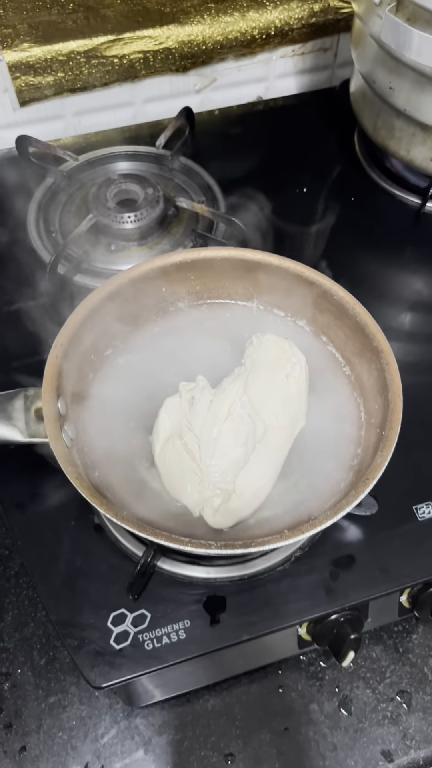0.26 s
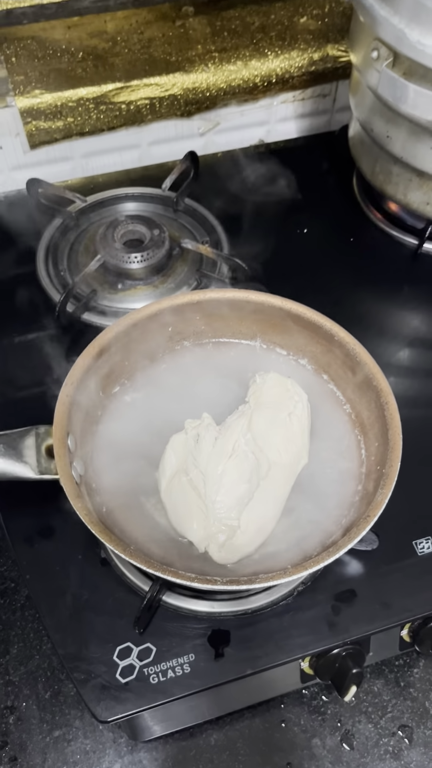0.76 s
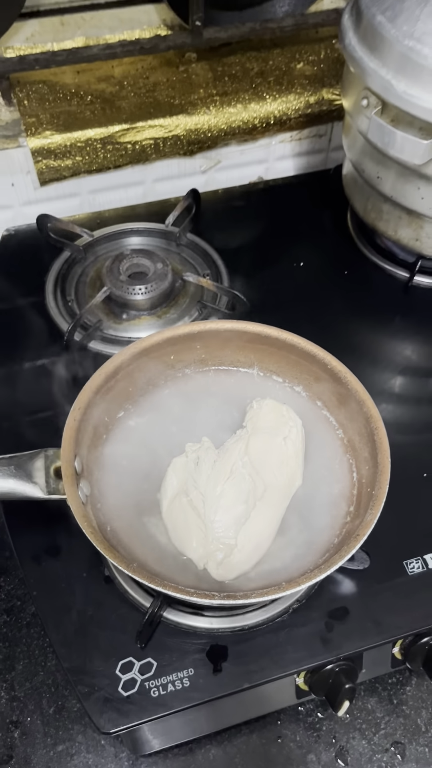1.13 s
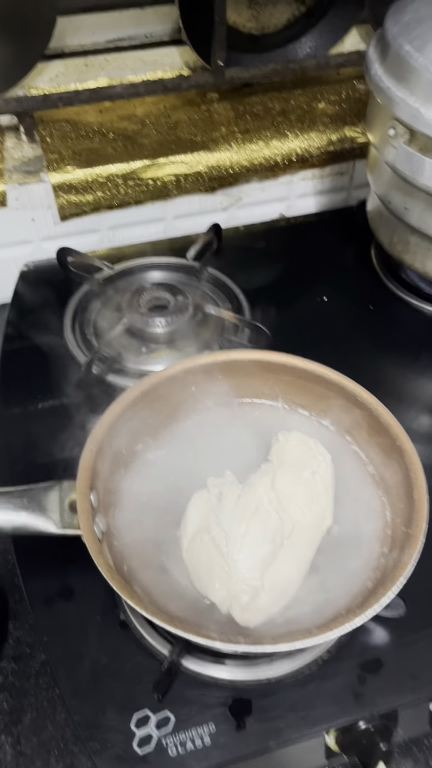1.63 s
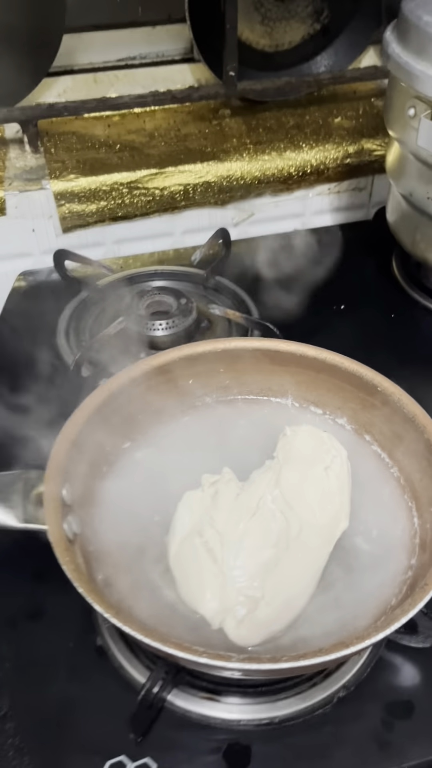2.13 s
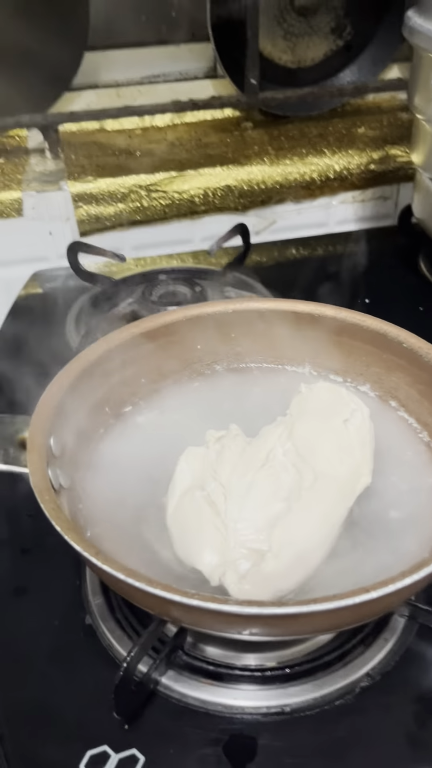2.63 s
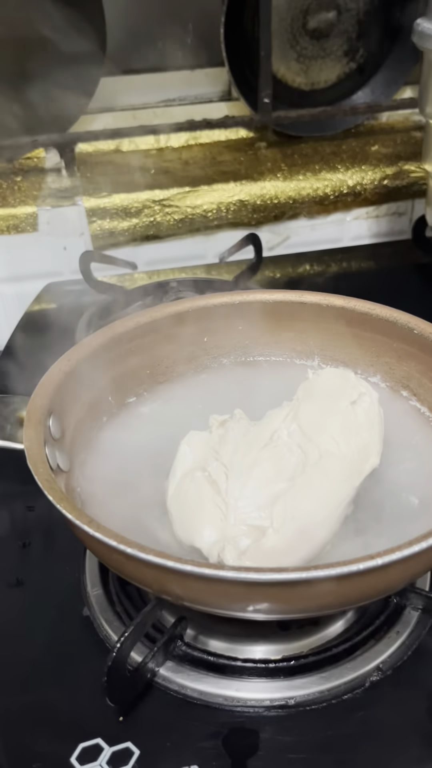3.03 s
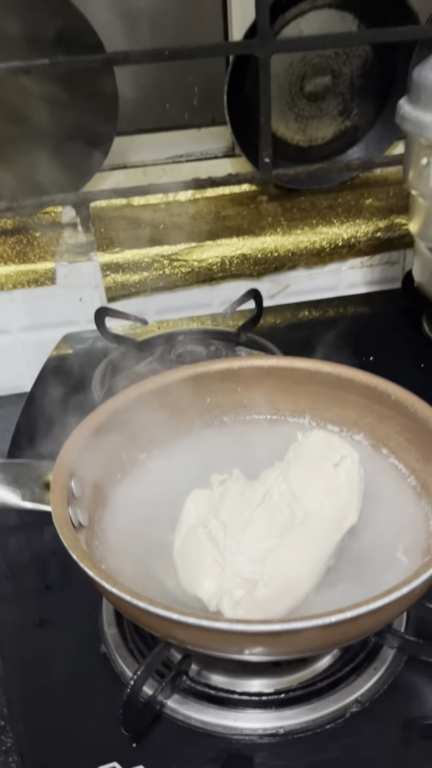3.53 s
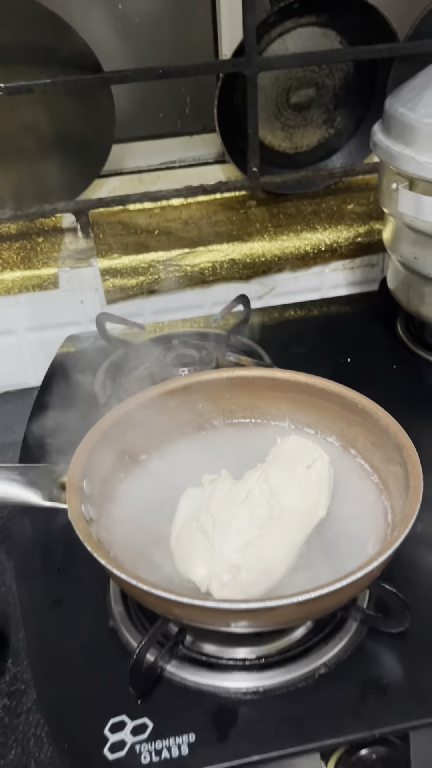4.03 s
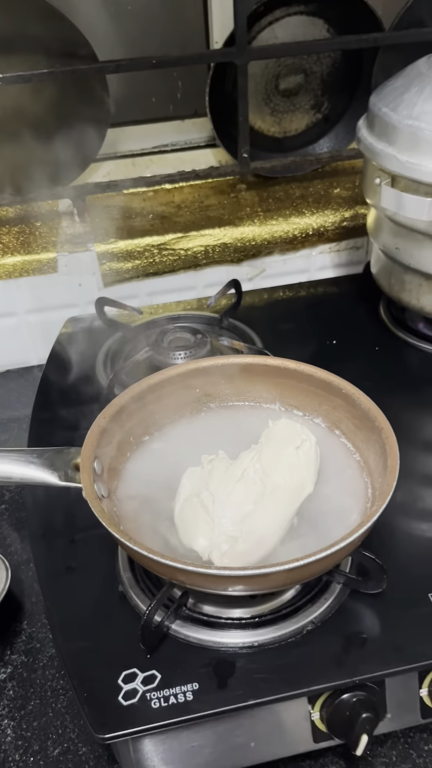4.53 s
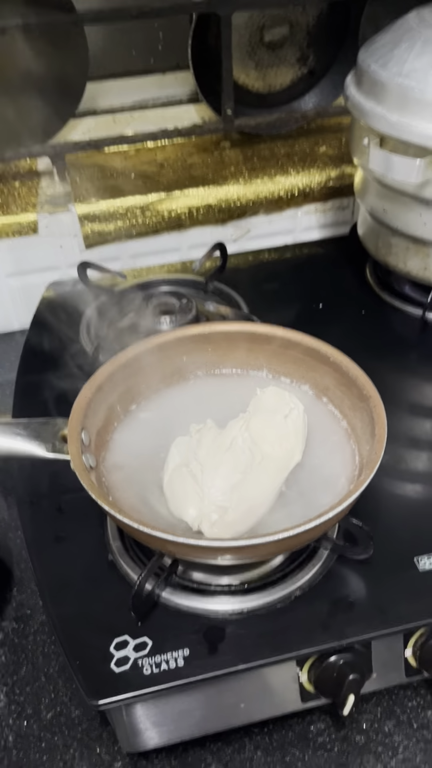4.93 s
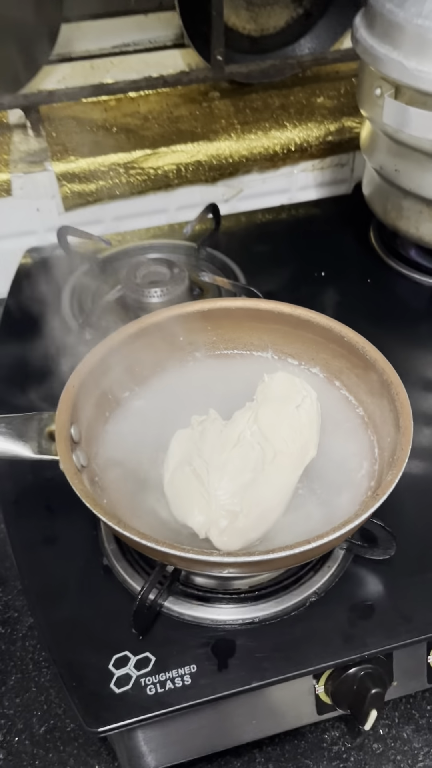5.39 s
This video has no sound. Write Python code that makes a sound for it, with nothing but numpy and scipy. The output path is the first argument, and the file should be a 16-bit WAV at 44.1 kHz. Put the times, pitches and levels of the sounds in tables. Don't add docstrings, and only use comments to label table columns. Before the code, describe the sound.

A deep fan drone and boomy air rumble dominate, steady but gently fluttering. Over them, countless tiny bubbles fizz in a pan on a gas burner, with thin treble hiss. Brief crackly sizzles come first, with sparse ones later. Part of the low hum fades after about three and a half seconds. Close stereo phone pickup, swaying by hand, in a small reflective room.

```python
import sys
import numpy as np
from scipy import signal
from scipy.fft import rfft, irfft, next_fast_len
from scipy.io import wavfile
from scipy.ndimage import uniform_filter1d

SR = 44100
rng = np.random.default_rng(int(sys.argv[2]) if len(sys.argv) > 2 else 0)


def volts_from_decibels(level):
    exponent = np.asarray(level, float) / 20
    return 10 ** exponent


def store_pcm(level_fs):
    pcm = np.round(np.clip(level_fs, -1, 1) * 32767).astype(np.int16)
    wavfile.write(sys.argv[1], SR, np.atleast_2d(pcm).T)


N = 249425
SIZE = next_fast_len(N)
HZ = np.arange(SIZE // 2 + 1) * SR / SIZE
TIME = np.arange(N) / SR


def level(x, db):
    return x * volts_from_decibels(db) / np.sqrt(np.mean(x ** 2))


def curves(table):
    seconds, *columns = np.transpose(table)
    return [np.interp(TIME, seconds, column) for column in columns]


def shape(points):
    hz, db = np.transpose(points)
    return volts_from_decibels(np.interp(np.log(HZ + 1), np.log(hz), db))


def colour(x, gain):
    return irfft(rfft(x, SIZE) * gain, SIZE)[..., :N]


def walk(rate):
    hold = int(SR / rate)
    steps = np.repeat(rng.standard_normal(N // hold + 1), hold)
    return 0.95 * uniform_filter1d(uniform_filter1d(steps, hold), hold)[:N]


def air(gain):
    phase = 2 * np.pi * rng.random((2, len(HZ)))
    size = rng.rayleigh(size=(2, len(HZ)))
    return irfft(gain * np.exp(1j * phase) * size, SIZE)[:, :N]


def modes(table):
    power = 0
    for hz, width, db in table:
        power = power + volts_from_decibels(db) ** 2 / (1 + (2 * (HZ - hz) / width) ** 2) ** 1.53
    return np.sqrt(power)


def steady(x, s):
    return x / np.sqrt(uniform_filter1d(x[0] ** 2, int(s * SR)) + 1e-18)


def shaft_level():
    sag_s, sag_width_s, sag_db = 1.15, 0.17, -7
    off_s, fade_s, rest_db = 3.6, 0.31, -59
    sag = sag_db * np.exp(-((TIME - sag_s) / sag_width_s) ** 2)
    hold = volts_from_decibels(-40 + sag + 0.74 * walk(4.3))
    decay = np.exp(-np.clip(TIME - off_s, 0, None) / fade_s)
    return 20 * np.log10(hold * decay + volts_from_decibels(rest_db))


def hum(shaft_db, mains_db):
    shaft_hz = 66.7 + 0.42 * walk(1.93)
    magnetic_hz = 100.0 + 0.067 * walk(0.93)
    shaft = np.sin(2 * np.pi * np.cumsum(shaft_hz) / SR)
    mains = np.sin(2 * np.pi * np.cumsum(magnetic_hz) / SR)
    tone = np.sqrt(2) * (volts_from_decibels(shaft_db - 1.5) * shaft + volts_from_decibels(mains_db - 0.5) * mains)
    return np.array([tone, 0.9 * np.roll(tone, SR // 360)])


def roar(low_db, mid_db, high_db):
    # frequency in Hz, width in Hz, level in dB.
    low_modes = [(136.5, 6.3, -0.5), (146.3, 11, -4), (157.3, 11.4, -2), (167.4, 2.06, 1), (191, 5.4, -8.5),
                 (207, 7.4, -12.5)]
    mid_modes = [(252.7, 11, -11), (287, 35, -7), (313, 7.7, -1.5), (327.6, 22, -4.5), (343.6, 12.6, 2)]
    # frequency in Hz, width in Hz, level in dB with the phone held back,
    # level in dB with it low and near the pan.
    high_modes = np.array([(381, 36, -4.5, -11), (418.2, 15, 1.5, -4.5), (457.3, 39, -3, 1.5),
                           (500, 11, -2.5, -17), (551, 39, -9, -24), (588, 61, -5.5, -10),
                           (657.3, 23, -5.5, -1), (700, 28, -7.5, -4.5), (756, 47, -17, -9)])
    # frequency in Hz, density in dB per Hz.
    rumble = [(20, -54), (33, -35), (42, -20), (52, -12), (62, 2.5), (85, -0.5), (105, 6), (118, -26),
              (230, -20), (400, -9), (800, -15), (1500, -33.5)]
    # time in seconds, share from 0 to 1.
    nearness = [
        (0, 0),
        (1.8, 0.1),
        (2.6, 1),
        (3.6, 0.8),
        (4.3, 0.62),
        (4.7, 0.37),
        (5.66, 0.04),
    ]

    low = steady(air(modes(low_modes)), 0.3)
    mid = steady(air(modes(mid_modes)), 0.31)
    near = np.clip(curves(nearness)[0], 0, 1)
    back = air(modes(high_modes[:, [0, 1, 2]]))
    close = air(modes(high_modes[:, [0, 1, 3]]))
    high = steady(np.sqrt(1 - near) * back + np.sqrt(near) * close, 0.3)

    out = level(air(shape(rumble)), -44.5)
    out = out + level(low, 0.51) * volts_from_decibels(low_db)
    out = out + level(mid, 0.78) * volts_from_decibels(mid_db)
    return out + level(high, 0.2) * volts_from_decibels(high_db)


def simmer(db):
    # frequency in Hz, width in Hz, level in dB.
    pan = [(905, 47, -1.5), (969, 54, 3), (1056, 70, 1.5), (1123, 41, 2.5), (1342, 46, -2), (1455, 96, 0.5),
           (1598, 92, 4), (1727, 59, 2), (1816, 65, 3), (1983, 83, 4), (2170, 85, 5.5), (2413, 76, 5.5),
           (2704, 57, 8.5), (3020, 58, 3.5)]
    collapse = shape([(400, -11), (800, 0.5), (1300, -0.5), (2000, -2.5), (2800, -2.5), (3300, -6.5),
                      (3800, -14.5), (6000, -34)])
    bubbles_per_s = 14000

    sign, size, arrival = rng.random((3, 2, N))
    sizes = np.sign(sign - 0.5) * volts_from_decibels(-1.5 * np.log(size + 1e-9))
    bubbles = sizes * (arrival < bubbles_per_s / SR) * volts_from_decibels(0.5 * walk(12))
    water = level(colour(bubbles, collapse), -1.8)
    rings = 0
    for patch in range(4):
        rings = rings + air(collapse * modes(pan[patch::4])) * volts_from_decibels(2.0 * walk(2.48))
    return level(steady(water + level(rings, -2.9), 0.48), 1.58) * volts_from_decibels(db)


def gas(db):
    jet = shape([(1500, -17), (3000, -1.5), (4000, 1), (5200, -0.5), (6300, -4), (8000, -5), (10000, -14),
                 (12000, -19.5), (14000, -21), (15000, -27), (15700, -30)])
    out, flutter = 0, walk(14)
    for hz in 2100 * 2 ** np.arange(0, 3.5, 0.5):
        octaves = np.log2((HZ + 1) / hz)
        band = np.cos(np.pi / 2 * np.clip(2 * octaves, -1, 1))
        out = out + air(jet * band) * volts_from_decibels(0.5 * flutter + 1.0 * walk(9))
    return level(out, 7.67) * volts_from_decibels(db)


def spits():
    # time in seconds, wet sizzle in dB, dry fizz in dB, fade in seconds,
    # sizzle pitch in Hz.
    drops = [(.01, -58, -55, 0.022, 3300), (.065, -45.5, -58, .02, 3300), (.125, -55, -50.5, 0.044, 3200),
             (.146, -42, -66, 0.018, 3300), (.203, -64, -52, .015, 3300), (2.226, -46, -51, .023, 3900),
             (3.06, -56, -58, .03, 3300), (4.17, -56, -56, .02, 3300), (5.19, -59, -60, .02, 3300),
             (5.48, -64, -59, .015, 3300), (5.543, -66, -53, .015, 3300), (5.58, -66, -57, .045, 3300)]
    # frequency in Hz, density in dB per Hz.
    wet_points = np.array([(2000, -24), (2850, -9), (3250, 8), (3600, 1), (3950, -6), (4400, -7),
                           (5400, -8), (7000, -28)])
    dry_points = [(3500, -17), (5000, -2), (8000, 3), (10500, 4), (13000, 1), (15700, -9)]
    wet_hz = 3300
    rise_share = 0.44

    out, fizz = 0, level(air(shape(dry_points)), 3.4)
    for s, sizzle_db, fizz_db, fade, hz in drops:
        swell = np.exp(-np.abs(TIME - s) / np.where(TIME < s, rise_share * fade, fade))
        sizzle = level(air(shape(wet_points * [hz / wet_hz, 1])), 3.7)
        out = out + swell * (volts_from_decibels(sizzle_db) * sizzle + volts_from_decibels(fizz_db) * fizz)
    return volts_from_decibels(1.5 * walk(400)) * out


def echoes(x):
    longest_s, strength = 0.02, 0.33
    lags = longest_s * rng.random((2, 2, 12, 1))
    signs = rng.standard_normal((2, 2, 12, 1))
    reflections = np.sum(signs * np.exp(-2j * np.pi * lags * HZ[::16]), axis=2)
    ripple = 1 + strength * reflections / np.sqrt(12)
    here, there = (colour(x, np.repeat(r, 16, axis=1)[:, :len(HZ)]) for r in ripple)
    sway = np.pi / 4 * (1 + np.sin(2.13 * walk(0.81)))
    return (np.cos(sway) * here + np.sin(sway) * there) / (np.cos(sway) + np.sin(sway))


def scene():
    # time in seconds, level change in dB.
    distance = [
        (0, .5),
        (1.2, 0),
        (3.0, 0),
        (3.6, -.7),
        (4.1, -1.3),
        (4.9, -1.04),
        (5.66, 0),
    ]
    # time in seconds, level change in dB.
    roar_swells = [(0, -1.5), (.3, 0.5), (.63, -5), (.85, 0), (1.5, -0.5), (1.8, 1), (2.2, 0), (2.6, -1.5),
                   (3.15, 1), (3.45, 0), (3.9, 1.5), (4.3, 0), (4.6, -1.5), (4.95, -1), (5.4, 1.5), (5.66, -4)]
    near_db, roar_swell_db = curves(distance)[0], curves(roar_swells)[0]

    low_churn, mid_churn, high_churn = (0.52 * walk(9.0) + 1.07 * walk(3.48) for _ in range(3))
    low_db = -29.5 + 0.9 * near_db + roar_swell_db + low_churn
    mid_db = -36.5 + 0.31 * roar_swell_db + mid_churn
    high_db = -38.5 + 0.068 * roar_swell_db + 0.53 * high_churn
    mains_db = -33.5 + 0.92 * near_db + 1.3 * walk(5.1)
    fan = hum(shaft_level(), mains_db) + roar(low_db, mid_db, high_db)

    stove = simmer(-41 + 1.15 * near_db) + gas(-54.5 + 0.74 * near_db) + spits()
    return fan + echoes(stove)


def top_cut(x):
    return signal.sosfilt(signal.butter(12, 15850, fs=SR, output="sos"), x)


def record(dry):
    # frequency in Hz, likeness from 0 to 1, half the left port's lead
    # in half turns (the whole lead in turns), left minus right in dB.
    port_table = [(60, .995, 0, -.6), (200, .99, -.01, -1), (350, .93, -.03, -2.5), (600, .7, -.03, -2),
                  (1200, .5, .02, .5), (1700, .7, .02, .5), (2700, .68, .49, 2), (3600, .25, .25, -1),
                  (4300, .35, .1, -1.5), (4900, .25, .2, -1), (5960, .96, .5, 0), (8020, .97, 1, 0),
                  (12430, .955, 2, 0), (16000, .96, 2.745, 0)]
    top_hz = 15725
    hz, *columns = np.transpose(port_table)
    alike, turns, tilt_db = (np.interp(HZ, hz, column) for column in columns)
    alike = np.clip(alike, 0, 1)
    shares = np.sqrt([(1 + alike) / 2, (1 - alike) / 2])
    shared, diffuse = rfft(dry, SIZE) * (HZ < top_hz) * shares
    lead = np.exp(1j * np.pi * turns) * volts_from_decibels(tilt_db / 2)
    left = (shared + diffuse) * lead
    right = (shared - diffuse) / lead
    return top_cut(irfft(np.array([left, right]), SIZE)[:, :N])


dry = scene()
out = record(dry)
store_pcm(out)
```